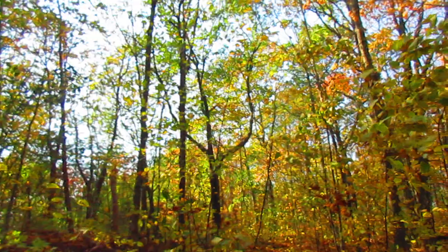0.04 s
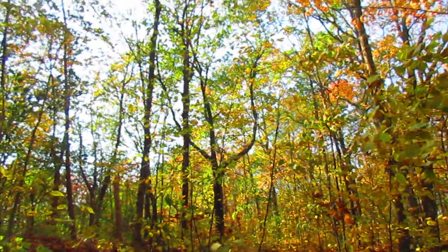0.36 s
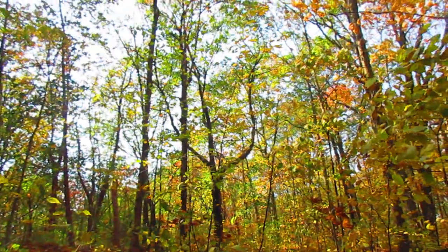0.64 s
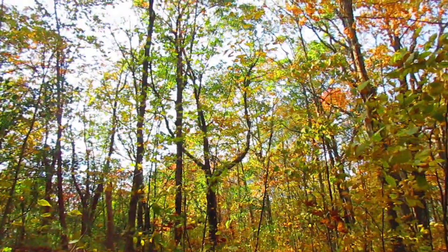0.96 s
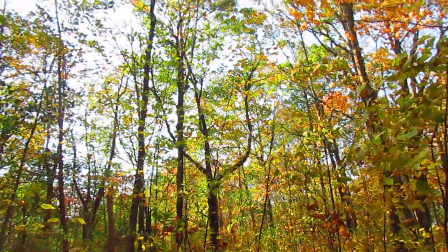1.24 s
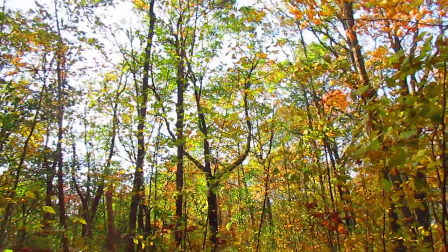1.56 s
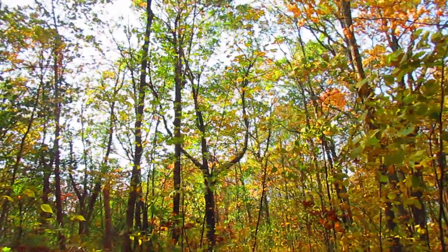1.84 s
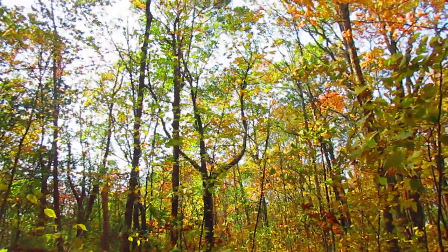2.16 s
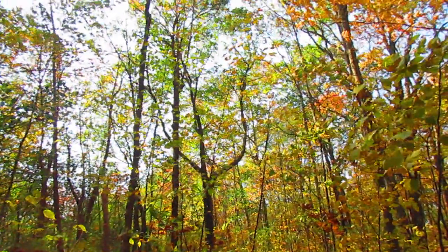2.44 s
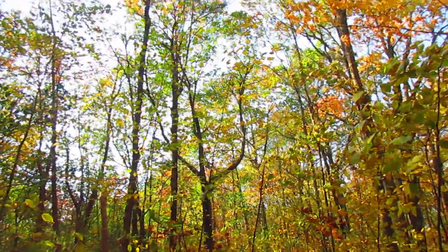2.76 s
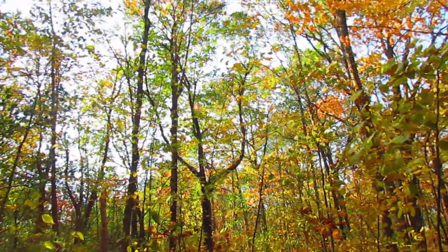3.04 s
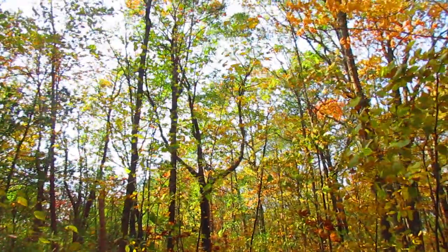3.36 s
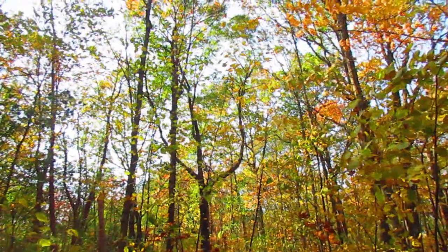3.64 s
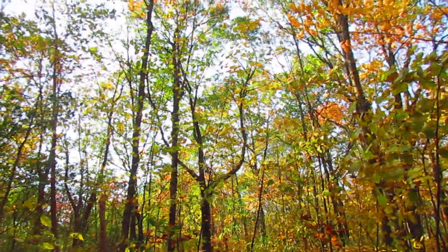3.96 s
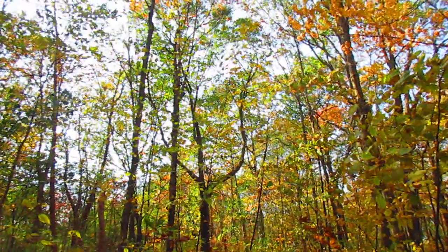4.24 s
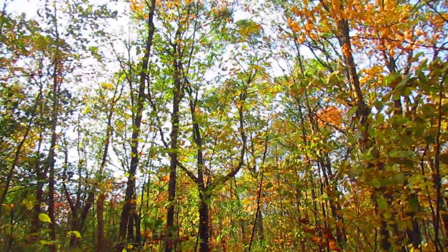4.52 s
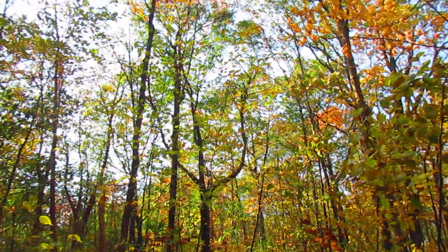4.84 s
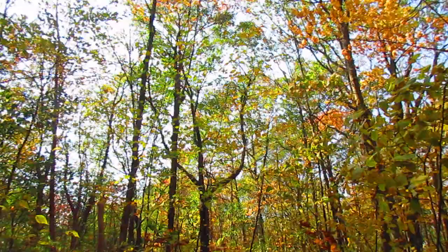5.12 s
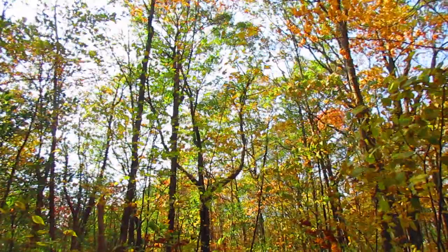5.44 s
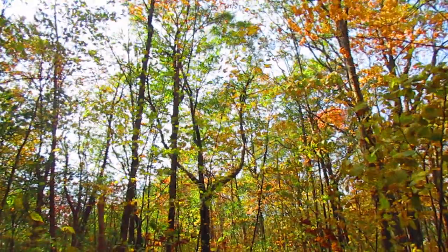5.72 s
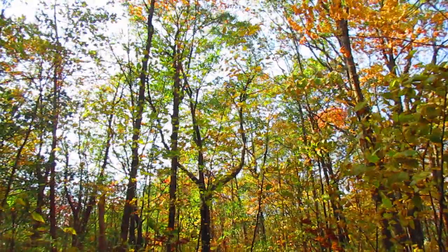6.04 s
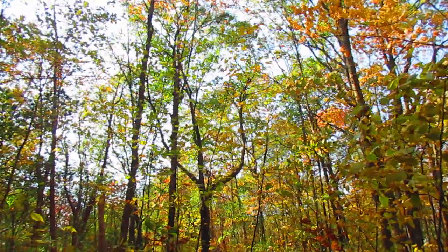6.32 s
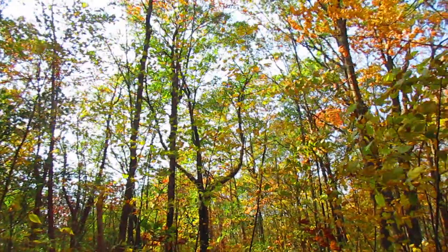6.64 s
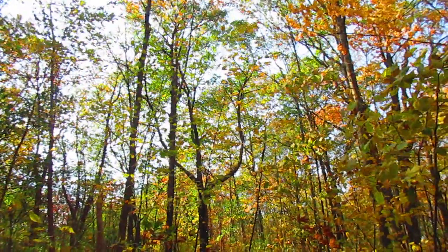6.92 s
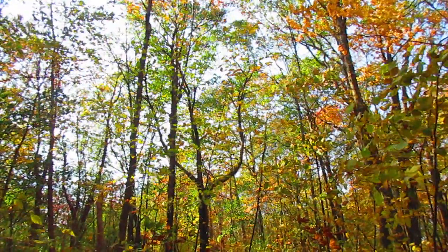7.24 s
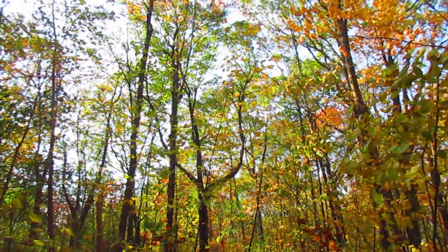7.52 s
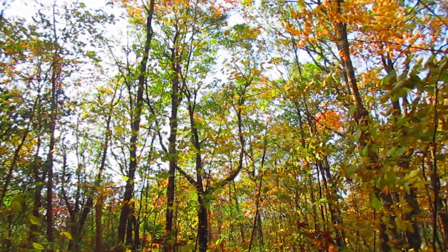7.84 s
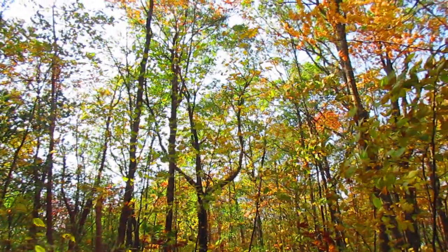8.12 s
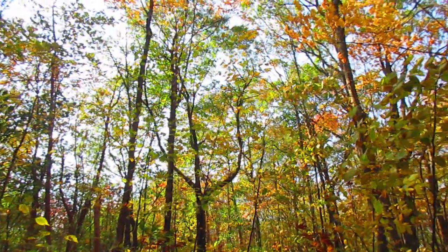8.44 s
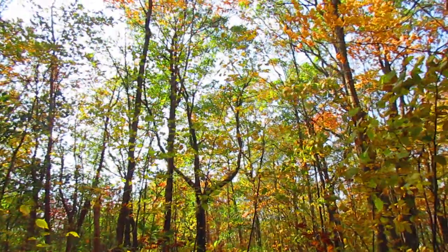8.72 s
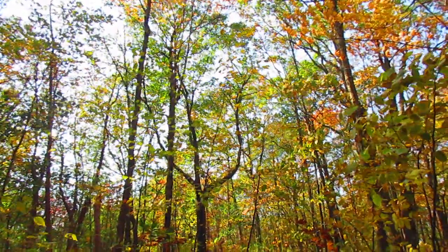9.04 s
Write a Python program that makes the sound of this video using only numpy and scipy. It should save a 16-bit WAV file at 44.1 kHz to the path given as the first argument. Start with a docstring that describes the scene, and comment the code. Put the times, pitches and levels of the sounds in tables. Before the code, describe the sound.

From about 0.2 seconds, wind blows across a bare microphone in a wood, making a low, sputtering rumble that flutters up in pitch with each puff. Behind it, much softer, countless leaves in the treetops blend into an even hiss. Irregular wind thumps come throughout, with strong ones near 0.4 and 0.9 seconds, the latter carrying a brief, crisp overload crack. More thumps land around 2.3 seconds, and at 2.9 seconds a single dry leaf ticks close by. The wind eases briefly around 4.5 seconds, then builds again, with notable thumps near 5.1, 5.5, 6.2 and 8.6 seconds. After the bigger thumps the leaf hiss drops a little and slowly recovers. Rumble and rustle continue until the end at about 9 seconds.

```python
"""A breeze in an autumn wood. From 0.2 s the crowns hiss with countless leaves, while eddies sweep
over a bare microphone: a low, sputtering rumble that flutters up in pitch with every puff.
Wind thumps the diaphragm now and then, with a crisp preamp overload crack at 0.94 s. After big thumps
the hiss ducks and slowly recovers: the recorder's gain control, drawn as a fixed level curve.
At 2.9 s one dry leaf ticks close by; wind and hiss go on to the end at 9.1 s."""
import sys
import numpy as np
from scipy import signal
from scipy.fft import rfft, irfft
from scipy.io import wavfile

SR = 44100
rng = np.random.default_rng(int(sys.argv[2]) if len(sys.argv) > 2 else 0)


def store_pcm(level_fs):
    """Save levels as 16-bit WAV."""
    pcm = np.round(np.clip(level_fs, -1, 1) * 32767).astype(np.int16)
    wavfile.write(sys.argv[1], SR, np.atleast_2d(pcm).T)


N = 400428
TIME_S = np.arange(N) / SR
FREQS_HZ = np.fft.rfftfreq(N, 1 / SR)


def gain_of(db):
    """dB to amplitude factor."""
    return 10 ** (np.asarray(db) / 20)


def unit_rms(x):
    """Scale to rms 1."""
    return x / np.sqrt(np.mean(x ** 2) + 1e-20)


def curve(rows):
    """Rows (t/s, values) to one piecewise linear curve per value column."""
    t_s, *columns = np.transpose(rows)
    return np.squeeze([np.interp(TIME_S, t_s, column) for column in columns])


def coloured(x, response):
    """Filter by rows (f/Hz, gain/dB)."""
    f_hz, gain_db = np.transpose(response)
    bin_db = np.interp(np.log(FREQS_HZ + 1), np.log(f_hz), gain_db)
    return irfft(rfft(x) * gain_of(bin_db), N)


def shaped_noise(spectrum):
    """Noise of rms 1 with the given spectral shape."""
    return unit_rms(irfft(rfft(rng.standard_normal(N)) * spectrum, N))


def wander(rate_hz):
    """Smooth random drift of rms 1, up to about rate_hz."""
    return shaped_noise(np.exp(-(FREQS_HZ / rate_hz) ** 2))


def swell(t_s, half_width_s):
    """Gaussian bump of height 1 at t_s."""
    return np.exp(-np.minimum(((TIME_S - t_s) / half_width_s) ** 2, 30))


def add_centred(mix, t_s, sound):
    """Mix in a sound centred on t_s."""
    start = max(round(t_s * SR) - len(sound) // 2, 0)
    part = mix[start:start + len(sound)]
    part += sound[:len(part)]


def crowns(trim_db=3.5, near_db=-12, touches_per_s=700, scuff_s=0.0015, flutter_db=0.42, flutter_hz=18):
    """Far leaves merge into a hiss; nearer ones brush each other in tiny scuffs."""
    # leaf hiss, ducked by the recorder's gain control after big thumps, then slowly recovering:
    # t/s, level before trim/dB
    ducked_level = [(0.21, -48), (0.63, -47), (0.8, -44), (0.935, -42.5), (0.96, -49), (1.5, -49.5),
                    (2.24, -47.3), (2.36, -49.5), (3.7, -45.5), (4.45, -45.5), (5.47, -44), (5.53, -49),
                    (6.16, -48), (6.4, -52.5), (7.6, -49), (8.55, -45), (8.62, -49), (9.08, -47)]
    # leaf hiss spectrum: f/Hz, relative density/dB
    leaf_spectrum = [(100, -2), (400, 8), (700, 5.5), (1000, 3.5), (1400, 1.5), (2000, 0), (3400, 0.14),
                     (5000, -3.5), (7000, -7), (8500, -10.5), (10500, -16), (13000, -20), (15700, -28)]
    touches = rng.exponential(1, N) * (rng.random(N) < touches_per_s / SR)
    scuff_power = signal.lfilter([1], [1, -np.exp(-1 / (scuff_s * SR))], touches)
    scuffs = unit_rms(np.sqrt(scuff_power) * rng.standard_normal(N))
    leaves = rfft(rng.standard_normal(N) + gain_of(near_db) * scuffs)
    # each leaf size has its own band and flutter
    centres_hz = np.geomspace(500, 12000, 6)
    hiss = np.zeros(N)
    for selector in np.eye(len(centres_hz)):
        band = np.interp(np.log(FREQS_HZ + 1), np.log(centres_hz), selector)
        hiss += irfft(leaves * band, N) * gain_of(flutter_db * wander(flutter_hz))
    return gain_of(trim_db + curve(ducked_level)) * unit_rms(coloured(hiss, leaf_spectrum))


def eddy_pitch_hz(draught_hz, lull_slowing=0.6, gustiness=0.125, gust_hz=60):
    """Eddy pitch follows air speed: draught plus puffs, slowed in lulls, never quite steady."""
    # puffs: t/s, pitch rise/Hz, half width/s
    puffs = [(0.239, 56.0, 0.028), (0.39, 36.02, 0.032), (0.502, 20.9, 0.01307), (0.616, 32.03, 0.039),
             (0.741, 40.99, 0.04), (0.854, 69.02, 0.048), (0.941, 68.07, 0.023), (1.036, 42.0, 0.041),
             (1.188, 31.0, 0.01503), (1.283, 42.04, 0.03), (1.35, 57.03, 0.022), (1.496, 59.98, 0.025),
             (1.644, 85.05, 0.019), (1.819, 60.0, 0.106), (1.999, 65.04, 0.042), (2.169, 86.0, 0.067),
             (2.285, 75.02, 0.033), (2.369, 82.96, 0.037), (2.583, 25.96, 0.03968), (2.757, 65.0, 0.00899),
             (2.954, 53.02, 0.068), (3.125, 33.9, 0.0091), (3.193, 41.01, 0.073), (3.316, 30.0, 0.081),
             (3.439, 44.97, 0.02099), (3.786, 34.05, 0.077), (4.174, 31.95, 0.052), (4.278, 31.06, 0.02201),
             (4.375, 22.03, 0.0631), (4.756, 52.95, 0.024), (5.003, 61.05, 0.053), (5.115, 44.1, 0.02304),
             (5.207, 30.88, 0.03897), (5.466, 33.93, 0.02), (5.591, 24.02, 0.04508), (5.845, 29.02, 0.031),
             (6.072, 39.05, 0.00801), (6.199, 89.0, 0.017), (6.336, 46.0, 0.01797), (6.397, 74.98, 0.019),
             (6.553, 38.99, 0.058), (6.766, 64.1, 0.054), (6.89, 90.98, 0.029), (6.995, 55.99, 0.052),
             (7.101, 51.99, 0.042), (7.138, 42.0, 0.01698), (7.207, 25.0, 0.0069), (7.347, 36.99, 0.05),
             (7.384, 37.07, 0.00902), (7.479, 28.0, 0.011), (7.78, 33.13, 0.00905), (7.919, 55.03, 0.077),
             (8.046, 45.0, 0.017), (8.142, 58.0, 0.024), (8.298, 29.97, 0.00804), (8.568, 71.02, 0.031),
             (8.642, 54.0, 0.019), (8.71, 74.06, 0.028), (8.976, 21.94, 0.01104)]
    # lulls in the flow: t/s, half width/s
    lulls = [(0.452, 0.029), (2.236, 0.01991), (2.793, 0.011), (3.136, 0.01095), (4.739, 0.011),
             (5.669, 0.00894), (5.773, 0.01496), (6.612, 0.01297), (7.127, 0.01498), (7.246, 0.01607),
             (8.238, 0.01595), (8.337, 0.00707), (8.862, 0.012), (9.026, 0.01194)]
    puff_hz = sum(rise_hz * swell(t_s, half_width_s) for t_s, rise_hz, half_width_s in puffs)
    lull = sum(swell(t_s, half_width_s) for t_s, half_width_s in lulls)
    eddy_hz = (draught_hz + puff_hz) * (1 - lull_slowing * lull)
    return np.maximum(eddy_hz, 5) * np.exp(gustiness * wander(gust_hz))


def rumble(eddy_hz, level_db=-14.5, speed_exponent=0.66, smoothness=0.59):
    """A frozen pattern of eddies passes the microphone at the speed of the air."""
    speed = eddy_hz / eddy_hz.mean()
    # small eddies die out: exponential roll-off
    pattern = shaped_noise(np.exp(-smoothness * FREQS_HZ / eddy_hz.mean()))
    pressure = np.interp(np.cumsum(speed), np.arange(N), pattern)
    return gain_of(level_db) * pressure * speed ** speed_exponent


def pulse(f_hz):
    """One swing between two shallow rebounds, spectral peak at f_hz."""
    t_s = np.arange(-1024, 1025) / SR
    u = (np.pi * f_hz * t_s) ** 2
    return (1 - 2 * u) * np.exp(-u)


def sputter(eddy_hz, pops_per_s=45, level_db=-18, spread_db=4, pitch_ratio=3.41, pitch_spread=0.32,
            speed_exponent=0.48):
    """Tight eddy cores pop at random: denser, harder and sharper in faster air."""
    speed = eddy_hz / eddy_hz.mean()
    pop_samples = np.flatnonzero(rng.random(N) < pops_per_s * speed / SR)
    out = np.zeros(N)
    for at in pop_samples:
        side, size, tightness = rng.uniform(-1, 1, 3)
        core = pulse(pitch_ratio * eddy_hz[at] * np.exp(pitch_spread * tightness))
        peak = speed[at] ** speed_exponent * gain_of(level_db + spread_db * size)
        add_centred(out, at / SR, np.sign(side) * peak * core)
    return out


def wind(trim_db=0.07, surge_db=1.5, surge_hz=35):
    """Rumble and sputter at the microphone port; pressure surges as the flow veers on and off it."""
    # steady flow: t/s, base eddy pitch/Hz, relative pressure/dB
    draught = [(0.2, 68.0, -1.2), (0.52, 56.0, 2), (0.86, 24.0, -0.2), (1.24, 61.0, 2.2),
               (2.16, 29.0, -2.5), (2.58, 44.0, 1.5), (3.06, 18.0, -0.9), (3.51, 48.0, 2.5),
               (4.02, 21.0, 0.9), (4.34, 41.0, 1), (4.55, 38.0, -5), (5.34, 46.0, 4.0), (6.28, 55.0, 0.3),
               (6.84, 27.0, -1.0), (7.58, 60.0, -0.6), (8.35, 34.0, -0.3), (8.61, 18.0, 2.9),
               (9.08, 28.0, -2)]
    # port response to wind pressure: f/Hz, gain/dB
    port = [(8, -21), (25, -27), (40, -7), (60, -2.5), (100, 0.5), (170, 1), (300, 1), (600, -0.5),
            (1000, -1), (1600, -15)]
    draught_hz, pressure_db = curve(draught)
    eddy_hz = eddy_pitch_hz(draught_hz)
    push = gain_of(trim_db + pressure_db + surge_db * wander(surge_hz))
    return push * coloured(rumble(eddy_hz) + sputter(eddy_hz), port)


def thumps(trim_db=1.5):
    """Wind thumps push or suck the diaphragm; the one at 0.94 s carries a crisp preamp overload crack."""
    # wind thumps and the crack (1200 Hz row): t/s, peak before trim/dB, f/Hz
    pulses = [(0.224, -14.5, 586.6), (0.256, -17.0, 515.6), (0.36, 0, 148.2), (0.51, -3, 106.1),
              (0.629, -18.5, 428), (0.852, -7.5, 366), (0.939, -20.5, 1200.0), (0.942, -2.5, 226.0),
              (1.308, -15.5, 427.0), (1.473, -11, 487.0), (1.794, -10.5, 387), (2.111, -14.5, 407.0),
              (2.268, -3.5, 242.0), (2.3, -3, 170.0), (2.378, -7.5, 407), (2.758, -8.5, 203),
              (2.969, -17.5, 440.0), (3.334, -4.5, 101.0), (3.371, -15.5, 313), (3.784, -2.5, 161.0),
              (4.141, -8.5, 177.0), (4.362, -5, 121), (4.717, -9, 131.0), (5.063, -3.5, 123.0),
              (5.239, -17.0, 355), (5.482, -2, 177.0), (6.195, -4.0, 384), (6.331, -16, 463.0),
              (6.339, -7.5, 180.1), (6.733, -16, 373.0), (6.779, -14.5, 353.0), (6.887, -10.0, 460.6),
              (7.38, -18, 499.6), (8.031, -16, 377.0), (8.561, -0.5, 81.1), (8.565, -9.0, 479)]
    out = np.zeros(N)
    for t_s, peak_db, f_hz in pulses:
        polarity = rng.choice([-1, 1])
        add_centred(out, t_s, polarity * gain_of(trim_db + peak_db) * pulse(f_hz))
    return out


def leaf_tick(rise_s=0.00027):
    """A stiff dry leaf snaps and rings for a few milliseconds."""
    # snap: t/s, level/dB
    ticks = [(2.912, -18.5)]
    # leaf modes: f/Hz, relative level/dB, T60/s
    modes = [(4000, 1.5, 0.0037), (5100, -2, 0.0034), (9600, -2, 0.0024), (10600, -12, .002),
             (13700, -11, .002)]
    out = np.zeros(N)
    for t_s, level_db in ticks:
        age_s = np.maximum(TIME_S - t_s, 0)
        attack = 1 - np.exp(-age_s / rise_s)
        for f_hz, mode_db, t60_s in modes:
            envelope = attack * np.exp(-np.log(1000) * age_s / t60_s)
            out += gain_of(level_db + mode_db) * envelope * np.sin(2 * np.pi * f_hz * age_s)
    return out


def scene():
    """Rustling wood behind wind at the microphone; mono."""
    return (crowns() + wind() + thumps() + leaf_tick())[None]


def record(dry, start_s=0.205, fade_s=0.003, notch_hz=7880, cutoff_hz=15720):
    """Recorder: late opening, soft clipping, narrow notch, band limit."""
    opened = dry * np.clip((TIME_S - start_s) / fade_s, 0, 1)
    rounded = opened / (1 + opened ** 6) ** (1 / 6)
    notched = signal.lfilter(*signal.iirnotch(notch_hz, Q=22, fs=SR), rounded)
    lowpass = signal.firwin(1023, cutoff_hz, window=("kaiser", 9), fs=SR)
    return signal.oaconvolve(notched, lowpass[None], "same")


dry = scene()
out = record(dry)
store_pcm(out)
```